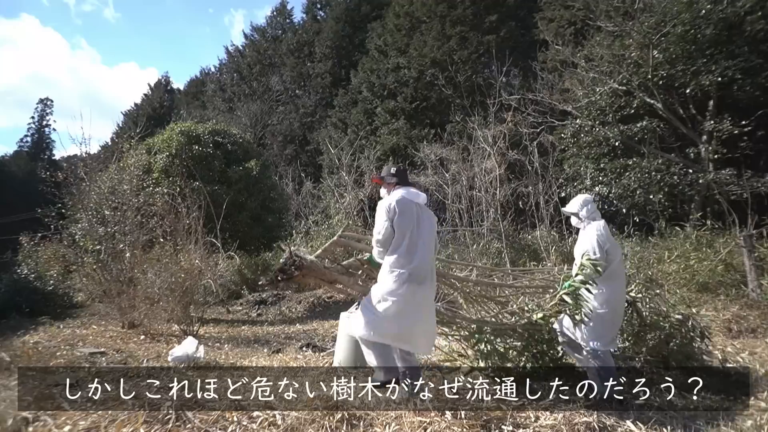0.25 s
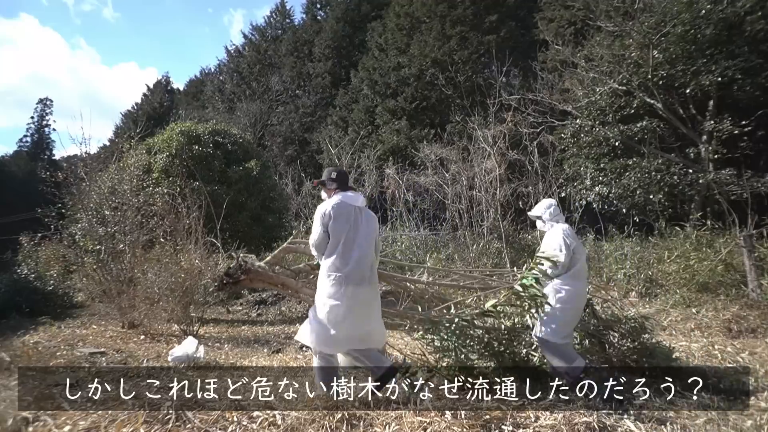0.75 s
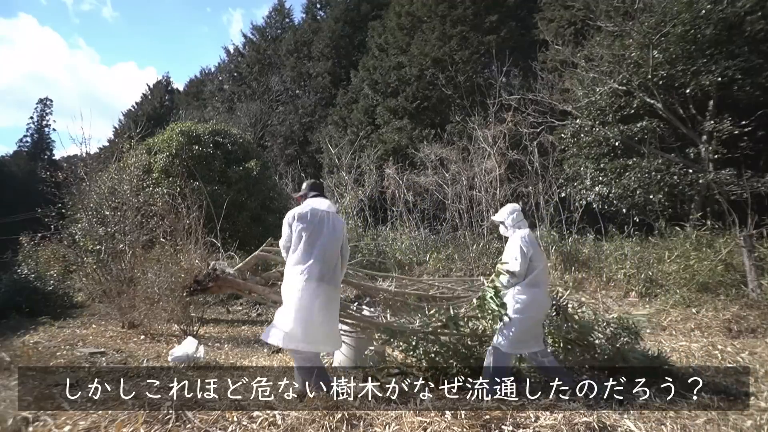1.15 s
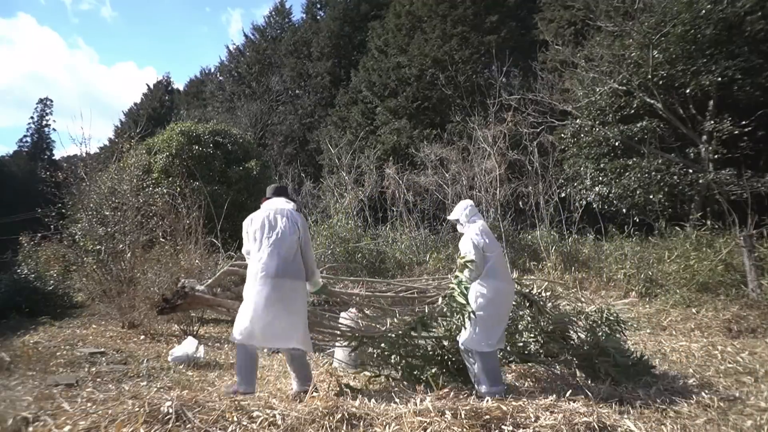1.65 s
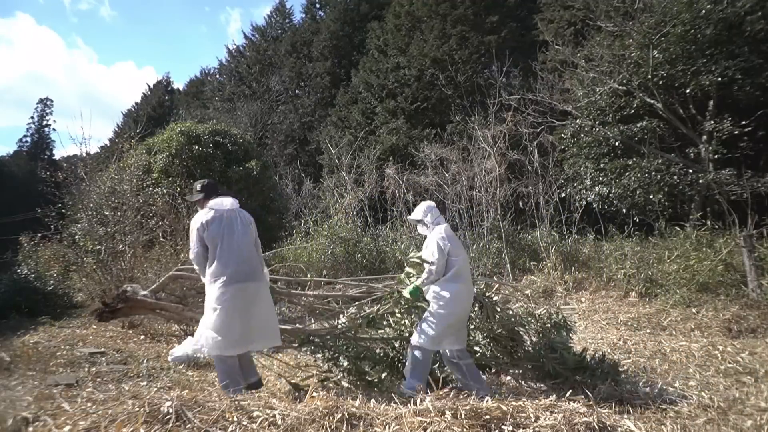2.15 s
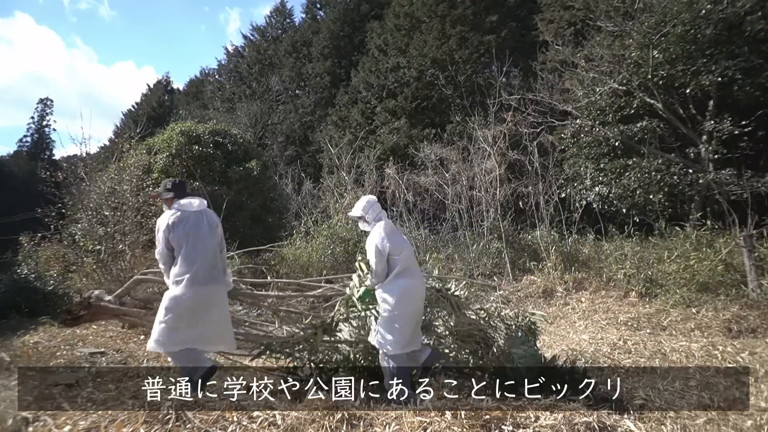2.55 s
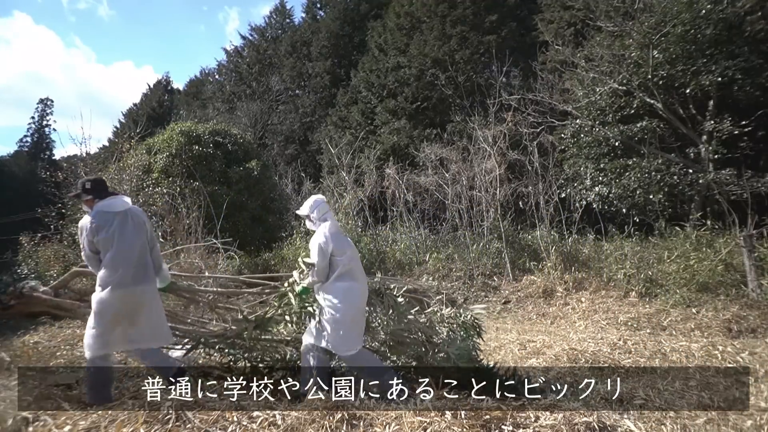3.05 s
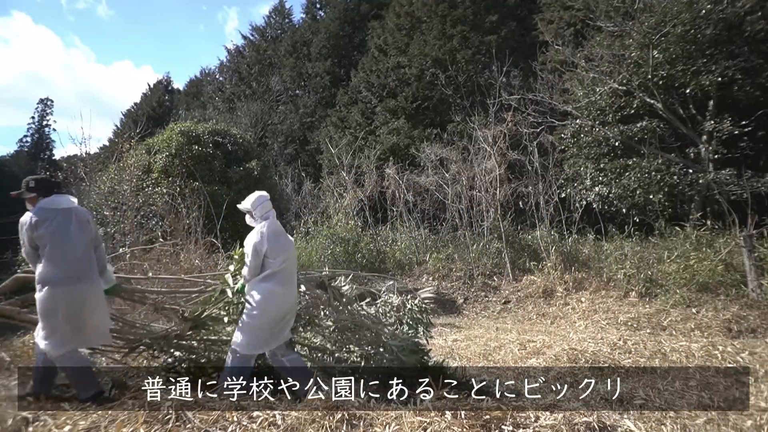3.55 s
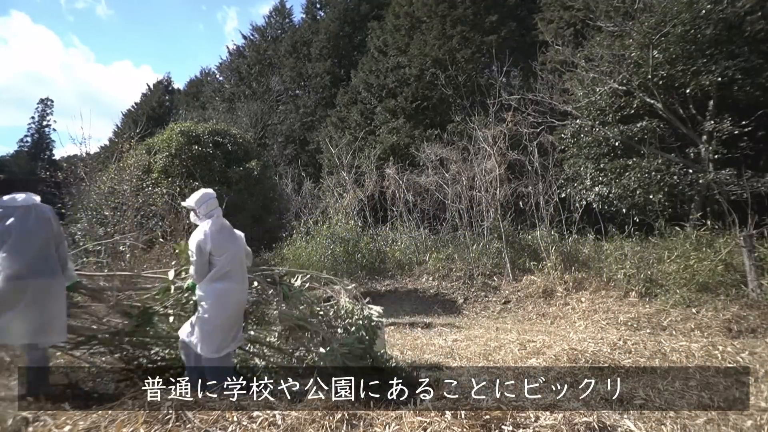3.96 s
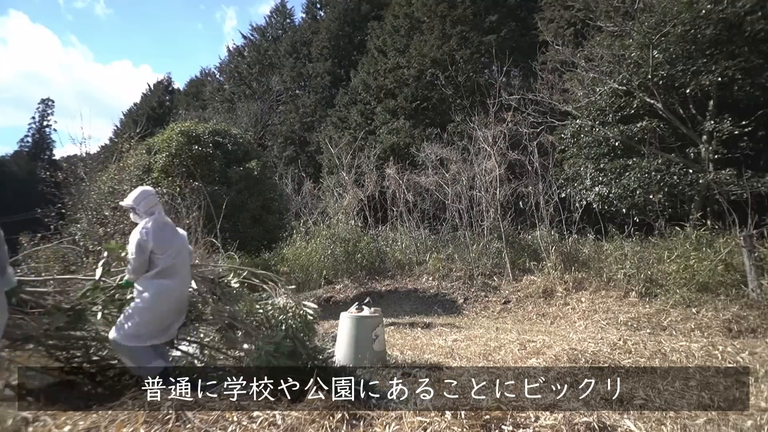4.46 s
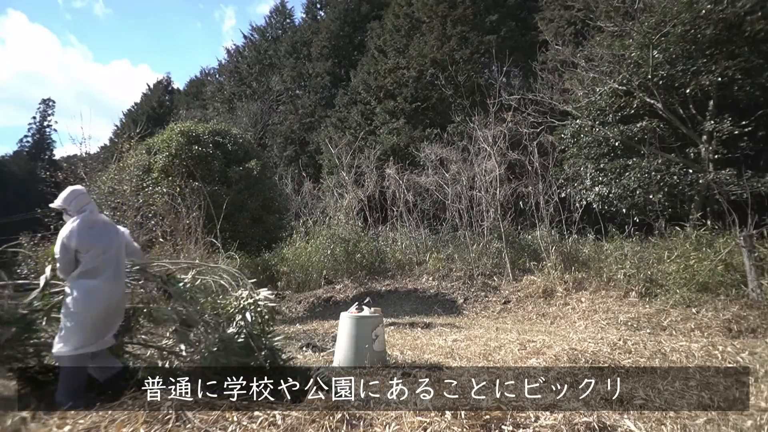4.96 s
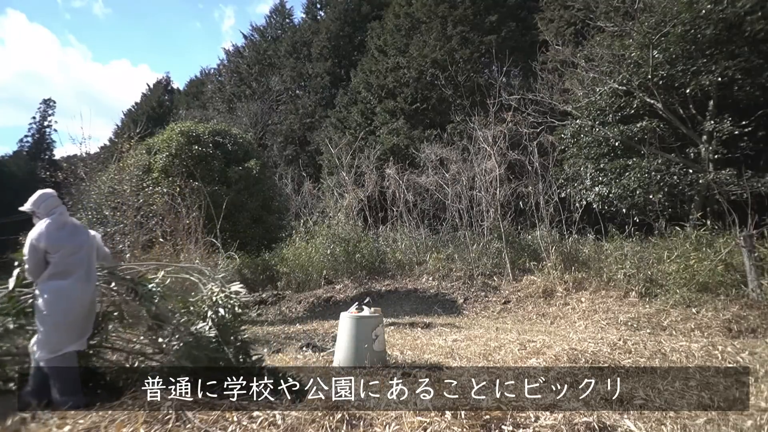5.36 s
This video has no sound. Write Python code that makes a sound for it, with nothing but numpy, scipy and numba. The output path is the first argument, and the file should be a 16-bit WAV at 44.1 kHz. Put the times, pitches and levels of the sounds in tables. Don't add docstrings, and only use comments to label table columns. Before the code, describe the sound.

Leafy cut branches are dragged over dry grass outdoors, a dense crackling rustle drifting right to left with twig snaps and dull knocks.

```python
import sys
import numpy as np
from scipy import signal
from scipy.fft import rfft, irfft, next_fast_len
from scipy.io import wavfile
from numba import njit

SR = 44100
rng = np.random.default_rng(int(sys.argv[2]) if len(sys.argv) > 2 else 0)


def gain_from_decibels(decibels):
    exponent = np.asarray(decibels, float) / 20
    return 10 ** exponent


def master_out(mix):
    frames = np.transpose(np.atleast_2d(mix))
    ceiling = np.clip(frames, -1, 1)
    pcm = np.round(ceiling * 32767).astype(np.int16)
    wavfile.write(sys.argv[1], SR, pcm)


N = 246519

BOUGH_SPREAD_DB = 2.5
PORT_LAG_S_PER_DB = .66e-5
PORT_LEAD_DB = .15
SHADOW_LEFT_HZ, SHADOW_RIGHT_HZ = 2500, 1000
PASS_S, PAN_DB_PER_S, PAN_LIMITS_DB = 2.6, 2.2, (-3.0, 4.6)


@njit
def scatter(at, hz, length, size, phase, total):
    out = np.zeros(total)
    for k in range(len(at)):
        first = int(np.ceil(at[k] - length[k] / 2))
        turn = np.exp(2j * np.pi * hz[k])
        fade = np.exp(2j * np.pi / length[k])
        wave = size[k] * np.exp(1j * (phase[k] + 2 * np.pi * hz[k] * (first - at[k])))
        window = np.exp(2j * np.pi * (first - at[k]) / length[k])
        for i in range(first, int(at[k] + length[k] / 2) + 1):
            if 0 <= i < total:
                out[i] += wave.real * (1 + window.real) / 2
            wave = wave * turn
            window = window * fade
    return out


def heard(s, hz, cycles, db, phase, side_db, pan_db):
    lag = (side_db - PORT_LEAD_DB) * PORT_LAG_S_PER_DB / 2
    length = np.maximum(cycles / hz * SR, 4)
    ports = []
    for side in (1, -1):
        at = (s - side * lag) * SR
        size = gain_from_decibels(db + side * pan_db / 2)
        ports.append(scatter(at, hz / SR, length, size, phase.copy(), N))
    return np.array(ports)


def place_db(s):
    return np.clip((s - PASS_S) * PAN_DB_PER_S, *PAN_LIMITS_DB)


# start in seconds, peak level in dB, pitch in Hz.
GROUND_KNOCKS = [(0.0408, -33.7, 280), (0.3617, -24.9, 440), (0.4634, -30.9, 460), (0.4874, -31.0, 450),
                 (0.5936, -31.6, 550), (0.9958, -32.8, 390), (1.02, -30.5, 380), (1.1468, -29.7, 420),
                 (1.6011, -36, 380), (1.6777, -35, 300), (1.008, -35, 800), (2.44, -33, 110),
                 (1.7703, -31.8, 350), (2.3397, -29.9, 310), (2.3713, -30.4, 310), (2.4001, -31.0, 310),
                 (2.9633, -29.6, 420), (3.1424, -31.2, 370), (3.4151, -30.1, 510), (3.9626, -32.8, 430),
                 (4.0168, -32.5, 500), (4.5657, -30, 120), (5.2309, -30.8, 320), (5.5513, -27, 240),
                 (5.568, -31, 140)]


def knocks():
    s, db, hz = np.transpose(GROUND_KNOCKS)
    pan = .3 * place_db(s)
    phase = 0.6 * rng.standard_normal((len(s), 3)).T
    blow = heard(s, hz, 2.1, db + 1.2, phase[0], pan, pan)
    edge = heard(s, 2.2 * hz, 2.1, db - 4.5, phase[1], pan, pan)
    thump = heard(s + .008, .45 * hz, 2.6, db - 12, phase[2], pan, pan)
    return blow + edge + thump


# start in seconds, peak level in dB, pitch in Hz, left minus right in dB.
TWIG_SNAPS = [(0.7531, -16.6, 4110, -4.3), (0.7799, -16.9, 5300, -5.4), (0.9947, -17.9, 7450, 1.4),
              (1.2651, -18.4, 5880, -4.1), (1.7025, -18.1, 7360, -3.4), (1.8281, -16.0, 7040, -3.7),
              (1.861, -14.3, 7480, -4.1), (2.0249, -16.6, 5590, -2.0), (2.2127, -13.1, 8770, -0.6),
              (2.3704, -11.8, 6930, 4.0), (2.4484, -16.0, 5250, 5.2), (3.2249, -15.3, 5950, 3.0),
              (3.2778, -13.0, 9220, 1.7), (3.5533, -13.0, 7530, 4.7), (3.6112, -14.9, 4810, 3.1),
              (3.712, -15.5, 9060, 4.0), (3.8334, -15.7, 4950, 2.2), (3.9526, -14.5, 7830, 3.0),
              (3.9633, -13.6, 5850, 6.5), (3.9884, -14.1, 5820, 3.6), (4.0581, -14.7, 4790, 1.5),
              (4.2053, -15.0, 6230, 6.1), (4.3377, -9.8, 11000, 1.4), (4.5516, -14.5, 5460, 7.3),
              (4.7556, -16, 3600, 6.5), (4.9011, -13.5, 8960, 8.4), (5.17, -15.7, 5300, 3.7),
              (5.1986, -15.0, 9540, 3.0), (5.2548, -16.9, 8660, 6.6), (5.3939, -14.7, 10760, 6.9)]


def twigs():
    s, db, hz, pan = np.transpose(TWIG_SNAPS)
    phase = 2 * np.pi * rng.random((len(s), 2)).T
    crack = heard(s, hz, 2.6, db + 3.2, phase[0], pan, pan)
    echo = heard(s + .0024, hz, 2.6, db - 4.5, phase[1], pan, pan)
    return crack + echo


def walk(s, rate):
    return np.interp(s * rate % 399, np.arange(400), rng.standard_normal(400))


def colour(x, gain):
    size = next_fast_len(N)
    bins = np.fft.rfftfreq(size, 1 / SR) + 1
    return irfft(rfft(x, size) * gain(bins), size)[:, :N]


LAYER_CENTRES = (110, 550, 3200, 6200, 11500)
# time in seconds, pull on the bough in dB, brightness (hiss over rustle) in dB.
HAUL = [(0.0, -30, 3.5), (.14, -38, -1), (.45, -33.5, 0), (.75, -32, -.5), (.95, -35.2, .7),
        (1.45, -36.2, .2), (1.9, -31, -.3), (2.4, -31.3, -.5), (2.82, -31.5, 0), (2.93, -29.5, 1),
        (3.3, -29.3, .3), (3.55, -31, 2), (3.92, -31, 2), (4.3, -31.5, 2.5), (4.76, -33.5, 2.5),
        (5.0, -36.5, 3), (5.2, -32.8, 2.5), (5.59, -33.5, 2)]
# peak time in seconds, swell in dB, centre in Hz, length in seconds.
FOLIAGE_JERKS = [(.45, 3, 11000, .06), (.76, 1.0, 5000, .08), (1.01, 5, 11000, .08), (1.15, 3, 6000, .07),
                 (1.55, 2, 6000, .1), (2.21, 4.5, 11000, .1), (2.37, 3, 11000, .07), (2.47, 2, 9000, .08),
                 (2.65, 2, 6000, .12), (2.93, 3, 9000, .14), (3.11, 4, 3200, .11), (3.34, 2.5, 2000, .06),
                 (3.27, 3.5, 3000, .13), (3.43, 3, 11000, .06), (3.55, 1.5, 11000, .06),
                 (3.95, 4, 11000, .05), (4.0, 3.5, 5500, .18), (4.21, 3.5, 3500, .07), (4.45, 3, 3200, .14),
                 (4.565, 4.5, 3500, .08), (4.69, 3, 11000, .15), (.6, 2.5, 6000, .2), (1.36, 2, 5500, .08),
                 (2.28, 2, 3500, .04), (4.87, 3, 3200, .06), (4.903, 4.5, 9000, .04),
                 (5.17, 3.5, 6000, .05), (5.22, 2, 11000, .14), (5.39, 2.5, 9000, .08)]
# peak time in seconds, swell in dB, centre in Hz, length in seconds.
TURF_BUMPS = [(.06, 6, 100, .1), (.5, 4, 450, .3), (.62, 3, 110, .08), (1.02, 7, 550, .1),
              (1.03, 5, 130, .15), (3.6, 2, 500, .15), (1.74, 5, 250, .18), (2.05, 4, 100, .1),
              (2.24, 3, 500, .1), (2.37, 6.5, 250, .28), (2.44, 7, 100, .1), (2.96, 4, 350, .07),
              (3.06, 4, 300, .07), (3.16, 6, 130, .1), (3.27, 3, 300, .07), (3.43, 3, 550, .06),
              (3.48, 5, 110, .12), (4.02, 4, 300, .1), (4.57, 6, 100, .08), (4.89, 5, 300, .14),
              (4.7, 2.5, 700, .25), (5.21, 2, 400, .2), (5.56, 7, 130, .1)]


def effort():
    t = np.arange(0, N / SR + .01, .002)
    when, pull, brightness = np.transpose(HAUL)
    leaf = np.interp(t, when, pull)
    bright = np.interp(t, when, brightness)
    pan = place_db(t)
    layers = np.array([.15 * leaf, .6 * leaf, leaf, leaf, leaf])
    layers[1] += .25 * pan
    layers[3] += .4 * bright - .3 * pan
    layers[4] += bright
    at, db, hz, length = np.transpose(FOLIAGE_JERKS + TURF_BUMPS)[:, :, None]
    rise_share = .4
    rise = 1 + (t - at) / (rise_share * length)
    fall = 1 - (t - at) / ((1 - rise_share) * length)
    swell = db * np.clip(np.minimum(rise, fall), 0, 1)
    reach_octaves = 1.3
    reach = np.exp(-(np.log2(hz / LAYER_CENTRES) / reach_octaves) ** 2)
    layers = layers + reach.T @ swell
    return t, layers - layers.mean(axis=1, keepdims=True)


# frequency in Hz, level in dB per Hz.
RUSTLE_COLOUR = [(13, -40), (25, -10.5), (45, -2.5), (64, -1.5), (125, -.8), (169, -7), (205, -4.7),
                 (431, -3.3), (984, -7.3), (1570, -4), (2190, -.9), (3900, 0), (8000, -1.7), (13500, -1),
                 (16000, -3.5)]
# frequency in Hz, spread in dB.
PORT_SPREAD = [(100, 1.5), (250, 2.0), (550, 4.0), (1400, 1.2), (2200, 3.2), (3300, 5.8), (11500, .6)]
# frequency in Hz, left over right in dB.
PORT_BALANCE = [(200, 0), (500, .7), (1400, .4), (2300, -2.0), (3800, -1.0), (7000, .9), (12000, -.3)]


def rustle():
    grains_per_s = 42000
    count = int(grains_per_s * N / SR)
    even = rng.random((count, 4)).T
    normal = rng.standard_normal((count, 3)).T
    s = (np.arange(count) + even[0]) / grains_per_s
    hz = 20 + 18500 * even[1]

    t, layers = effort()
    place = np.interp(np.log(hz), np.log(LAYER_CENTRES), np.arange(5))
    share = [np.clip(1 - abs(place - k), 0, 1) for k in range(5)]
    db = 0
    for weight, layer in zip(share, layers):
        db = db + weight * (np.interp(s, t, layer) + 0.8 * walk(s, 30))
    flutter = 0.6 * walk(s, 45) + 0.4 * walk(s, 70)
    bursts = 0.7 * np.maximum(walk(s, 65), 0) ** 2
    db = db + np.clip(hz / 5000, .2, 1) * (flutter + bursts)

    cycles = 3.0 * np.exp(.3 * normal[0]) * (1 + 1.2 * share[0])
    db = db - 10 * np.log10(cycles / hz)
    db = db - 1.5 * np.clip(hz / 1500, .1, 1) * np.log(1.0005 - even[2])

    side_db = place_db(s) + BOUGH_SPREAD_DB * normal[1]
    shadow_hz = np.where(side_db > 0, SHADOW_LEFT_HZ, SHADOW_RIGHT_HZ)
    side_db = side_db / (1 + (shadow_hz / hz) ** 4.5)
    scatter_db = normal[2] * np.interp(hz, *np.transpose(PORT_SPREAD))
    pan_db = side_db + scatter_db + np.interp(hz, *np.transpose(PORT_BALANCE))

    flat = heard(s, hz, cycles, db, 2 * np.pi * even[3], side_db, pan_db)
    f, gain_db = np.transpose(RUSTLE_COLOUR)
    out = colour(flat, lambda bins: gain_from_decibels(np.interp(np.log(bins), np.log(f), gain_db)))
    return out * gain_from_decibels(-26.4) / np.sqrt(np.mean(out.mean(axis=0) ** 2))


def scene():
    return knocks() + twigs() + rustle()


def top_cut(x):
    return signal.sosfilt(signal.butter(12, 16020, fs=SR, output="sos"), x)


def record(dry):
    return top_cut(dry)


dry = scene()
out = record(dry)
master_out(out)
```